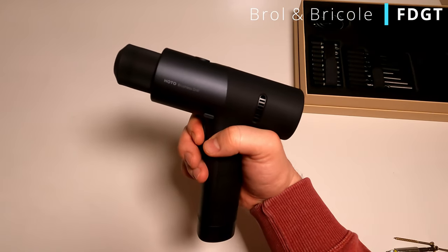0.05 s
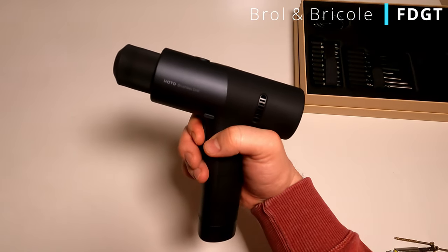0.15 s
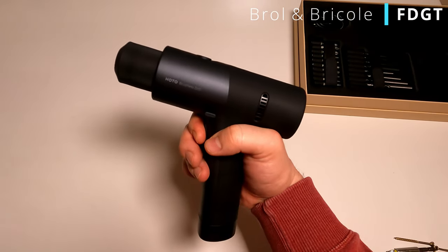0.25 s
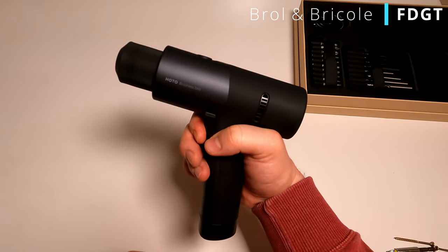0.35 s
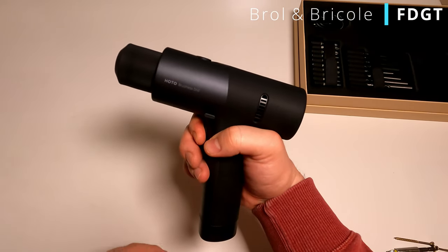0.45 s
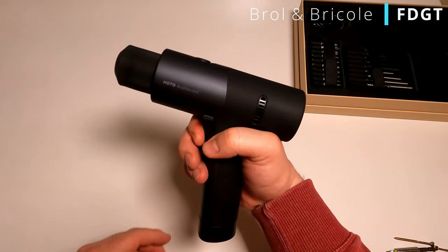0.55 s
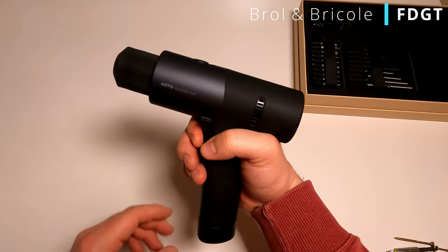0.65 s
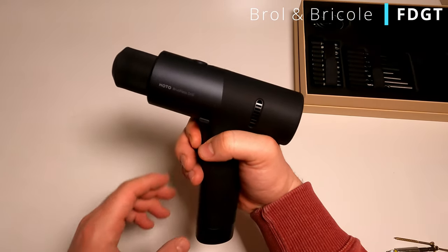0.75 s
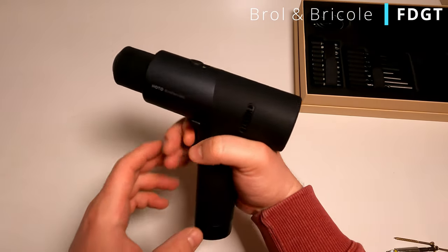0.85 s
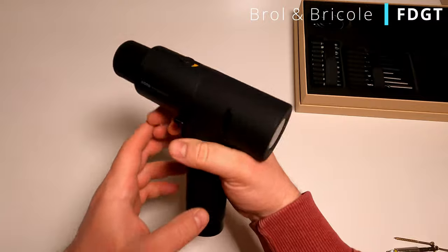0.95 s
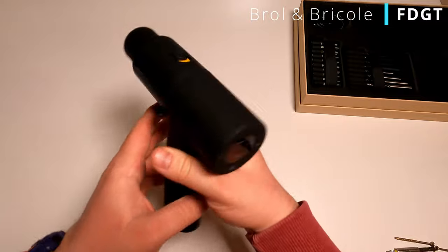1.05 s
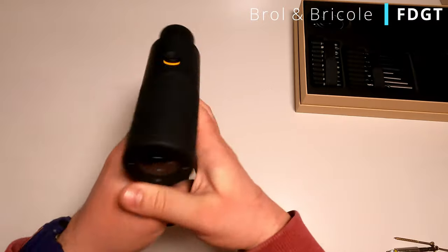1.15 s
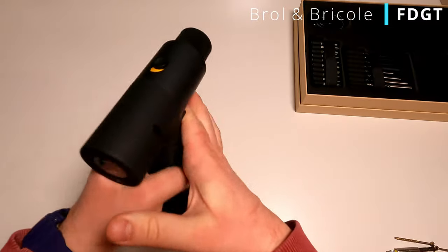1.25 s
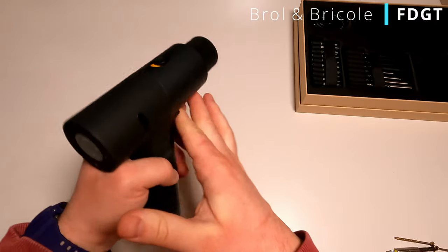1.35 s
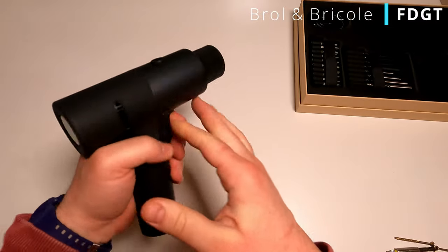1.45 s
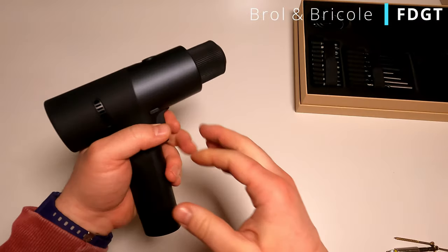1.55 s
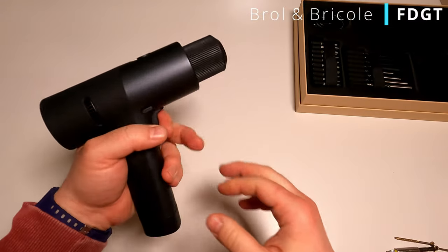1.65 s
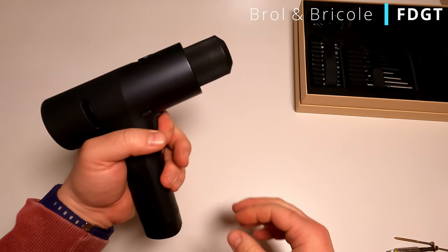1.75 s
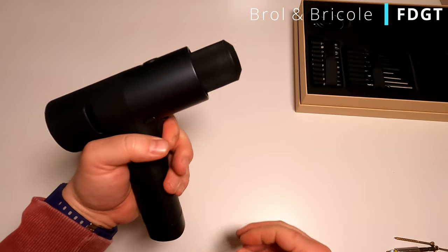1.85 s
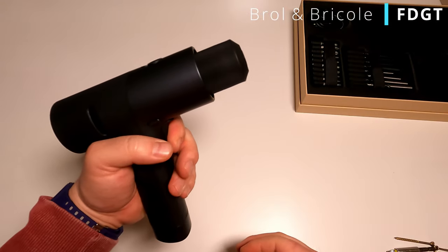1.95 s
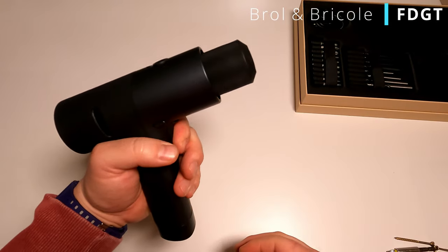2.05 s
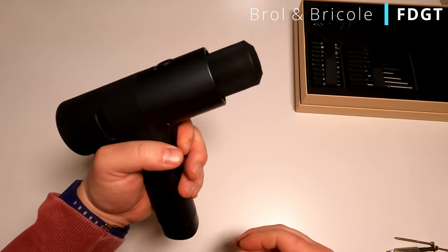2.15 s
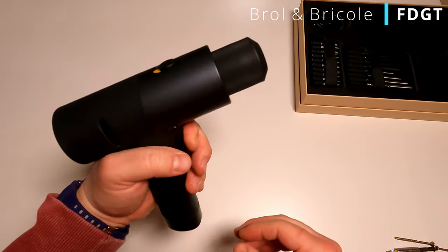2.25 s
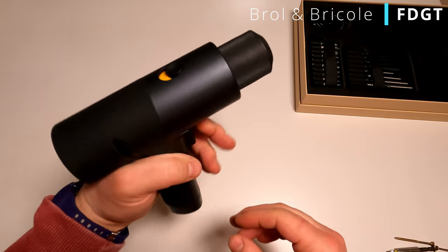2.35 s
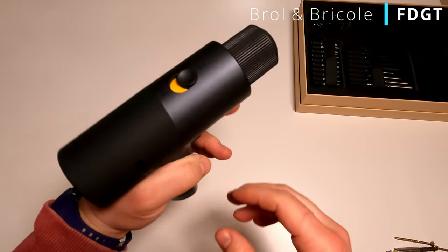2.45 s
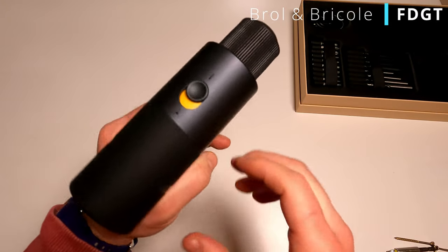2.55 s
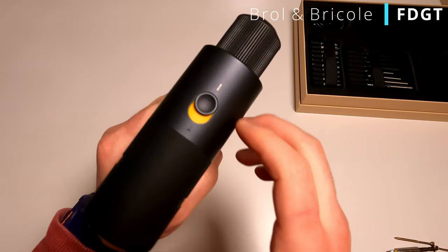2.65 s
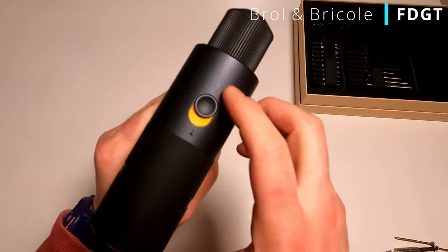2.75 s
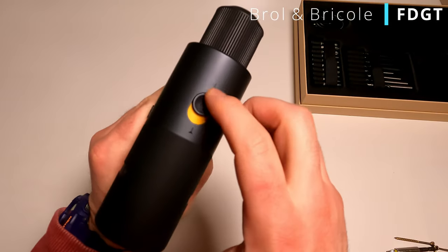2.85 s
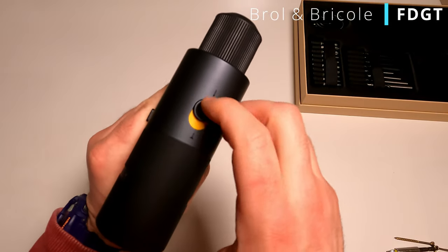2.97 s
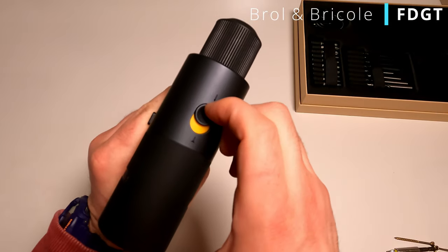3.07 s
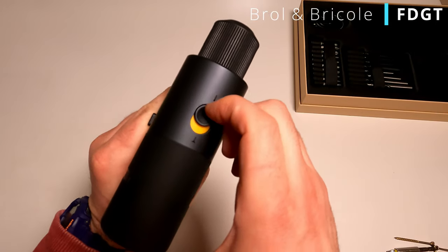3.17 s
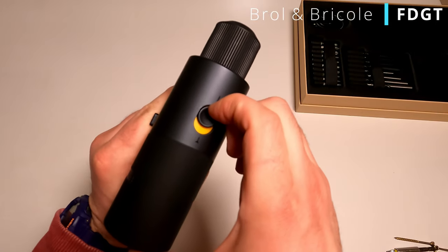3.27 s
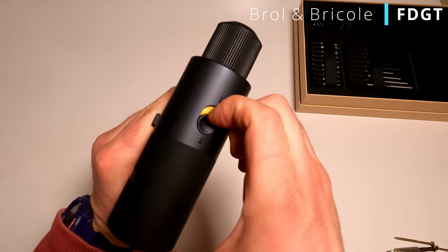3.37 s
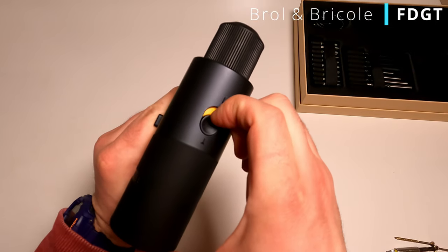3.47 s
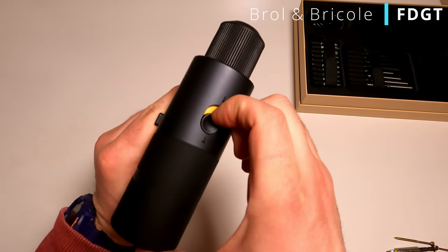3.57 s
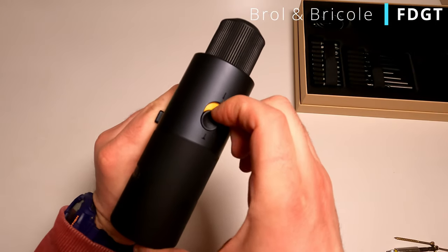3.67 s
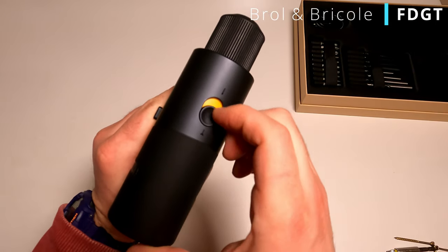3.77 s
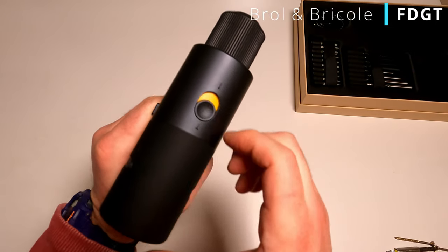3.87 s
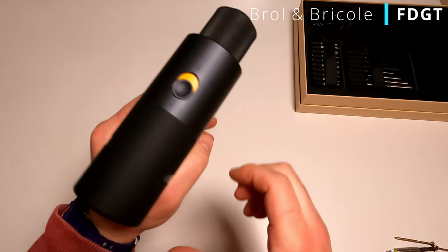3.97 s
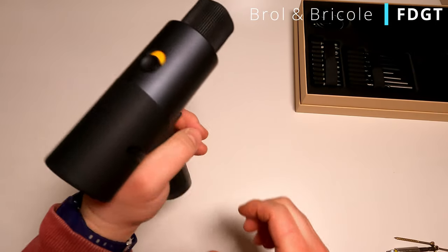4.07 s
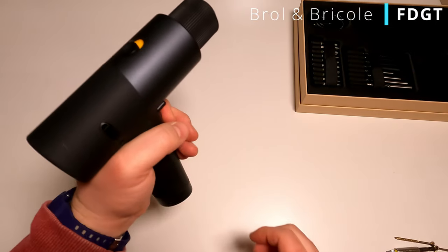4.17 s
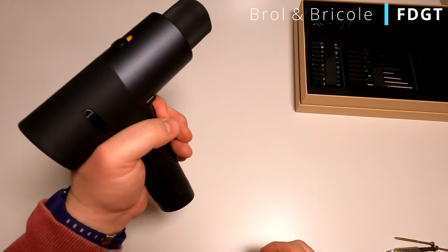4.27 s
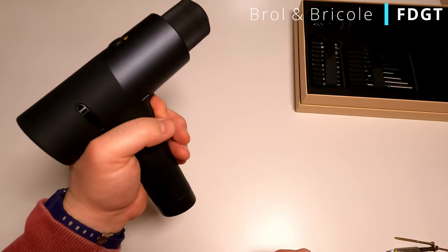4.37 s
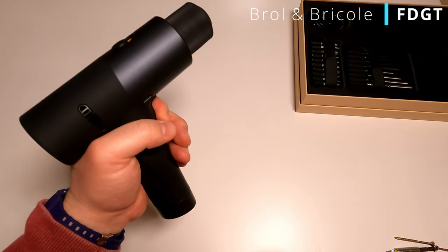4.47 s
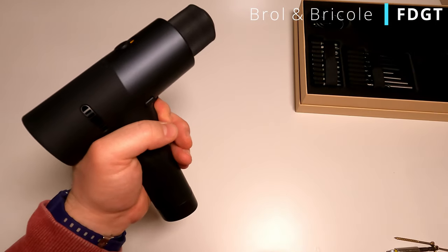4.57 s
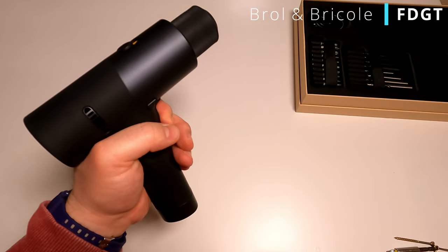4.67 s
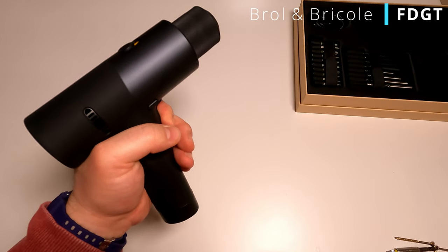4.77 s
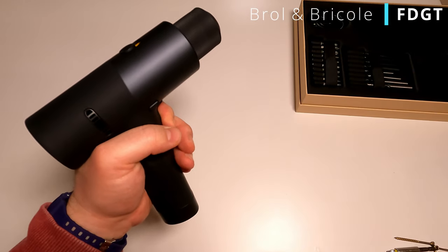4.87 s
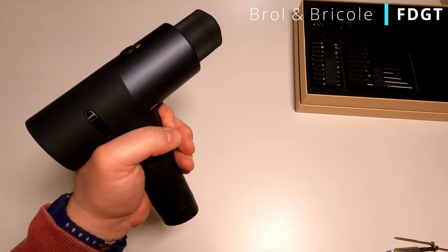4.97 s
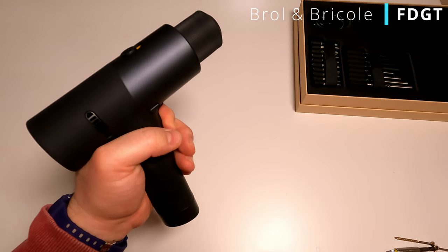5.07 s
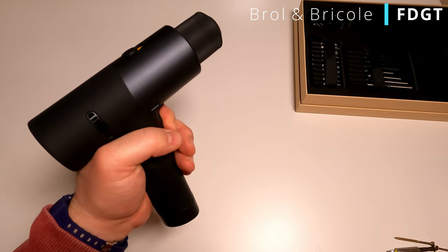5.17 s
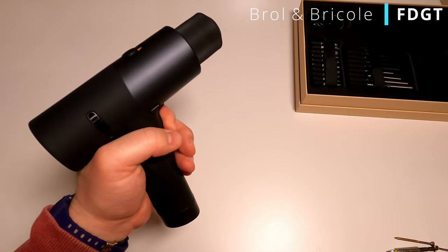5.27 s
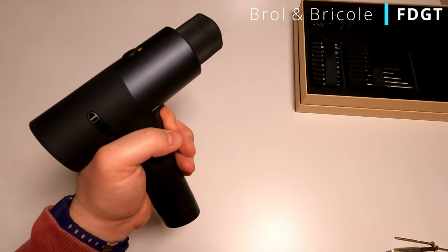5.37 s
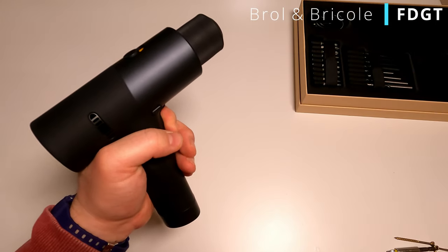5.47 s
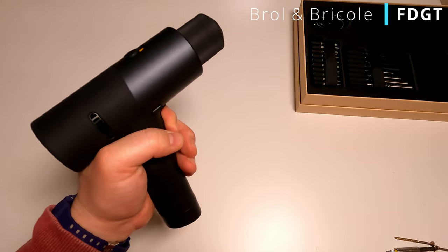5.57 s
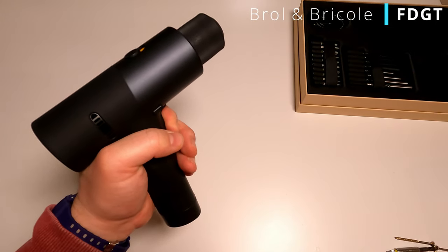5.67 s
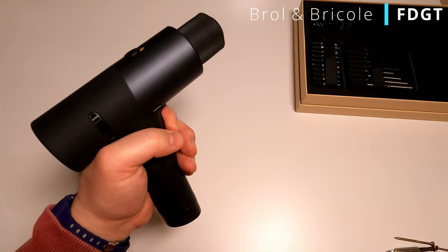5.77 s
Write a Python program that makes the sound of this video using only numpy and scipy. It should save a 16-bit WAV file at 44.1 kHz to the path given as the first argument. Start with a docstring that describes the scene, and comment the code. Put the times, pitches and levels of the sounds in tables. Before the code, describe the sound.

Pulsing, rattling whirr of a handheld electric drill, stopping twice with a metallic crack, quiet handling and one sharp plastic snap before restarting.

```python
"""A cordless drill runs unloaded in three bursts, close to the microphone in a small room: it is already running
at the start and still running at the end. Its motor speed surges about four times a second and drives gear tones
(sines), tooth rattle (shaped noise) and a thin switching whistle; ringing clacks mark the starts and surges.
The spindle lock cracks at each stop. Between bursts hands rub the housing and push a sliding switch until it
snaps over: shaped noise and short clicks, over soft finger knocks, arm rumble and a quiet room tone."""
import sys
import numpy as np
from scipy import signal
from scipy.fft import rfft, irfft, next_fast_len
from scipy.io import wavfile
from scipy.ndimage import uniform_filter1d, map_coordinates

SR = 44100
rng = np.random.default_rng(int(sys.argv[2]) if len(sys.argv) > 2 else 0)


def master(y):
    """Save y as 16-bit WAV."""
    cut = np.clip(np.atleast_2d(y).T, -1, 1)
    pcm = np.round(cut * 32767)  # scale
    wavfile.write(sys.argv[1], SR, pcm.astype(np.int16))


N = 256662

# one surge of the motor at full share, from idle back to idle: since_start_s, speed_turns_per_s
SURGE = [(0, 408), (.02, 590), (.039, 638), (.061, 657), (.083, 637), (.123, 553), (.183, 424), (.203, 408)]
IDLE_SPEED = SURGE[0][1]  # turns per s
# trigger bursts: pressed_s, let_go_s, share_of_full_speed, rattle_db, whine_db, whistle_db, left_minus_right_db
BURSTS = [(-.2845, 1.034, 0.97, -26.9, -33, -48, -1), (1.794, 2.39, 0.97, -26.9, -34, -50, 0.2),
          (4.1734, 6, 1, -30, -33.5, -50, 0.8)]
FIRST_SURGE_S, SURGE_PERIOD_S = .2248, .2608  # wait after the trigger is pressed, then a steady rhythm
# colour of a metallic crack: frequency_hz, level_db_per_hz
METAL_COLOUR = [(180, -67.5), (300, -35), (1450, -7.5), (2080, -9.5), (2880, -1.5), (4050, -10), (6190, -9),
                (6710, -13.5), (11900, -32), (14700, -55.5)]


def amp(db):
    """Decibels to an amplitude factor."""
    return 10 ** (np.asarray(db) / 20)


def unit(x):
    """Scale to rms 1."""
    return x / np.sqrt(np.mean(x ** 2) + 1e-20)


def clock():
    """Time of every sample in seconds."""
    return np.arange(N) / SR


def along(points, hz):
    """Read a curve of (Hz, value) points on a log frequency axis."""
    f, v = np.transpose(points)
    return np.interp(np.log(hz + 1), np.log(f + 1), v)


def wobble(rate):
    """A smooth random curve, rate knots a second."""
    knots = rng.standard_normal(int(N * rate / SR) + 4)
    return map_coordinates(knots, [clock() * rate])


def filtered(x, response):
    """x times a complex response of frequency."""
    size = next_fast_len(N + SR // 2)
    hz = np.fft.rfftfreq(size, 1 / SR)
    return irfft(rfft(x, size) * response(hz), size)[..., :N]


def coloured(x, spectrum):
    """x shaped by (Hz, dB) points, at rms 1."""
    return unit(filtered(x, lambda hz: amp(along(spectrum, hz))))


def impulse(spectrum, size=1024):
    """The causal response of energy 1 that has this spectrum, by folding its cepstrum (minimum phase)."""
    hz = np.fft.rfftfreq(size, 1 / SR)
    cepstrum = irfft(np.log(amp(along(spectrum, hz)) + 1e-6))
    cepstrum[1:size // 2] *= 2
    cepstrum[size // 2 + 1:] = 0
    h = irfft(np.exp(rfft(cepstrum)))
    return h / np.linalg.norm(h)


def add(track, s, sound):
    """Mix a sound into a track at time s."""
    part = track[..., max(round(s * SR), 0):][..., :sound.shape[-1]]
    part += sound[..., :part.shape[-1]]


def drill(rattle_growth):
    """Motor speed drives all three layers: faster is louder, and the gear tones rise."""
    # gear rattle as it leaves the housing, one per burst: frequency_hz, level_db_per_hz
    rattle_a = [(71, -60), (120, -29), (243, -19), (748, -16), (1290, -6), (2310, -7.5), (2880, -3.5),
                (3380, -4.5), (6560, -12), (8180, -21), (10200, -29), (11100, -34), (13800, -43),
                (14700, -89)]
    rattle_b = [(71, -51.5), (120, -24.5), (844, -18.5), (1140, -12), (1370, -9), (1850, -4), (2350, -6),
                (3120, -3.5), (3450, -6), (7400, -12), (8180, -21), (12500, -35), (13800, -47),
                (14700, -89.5)]
    rattle_c = [(71, -51), (120, -23.5), (194, -15), (861, -17.5), (1780, -5), (2310, -8), (3120, -2),
                (4480, -8), (7550, -5), (8350, -18), (10200, -23), (11500, -34.5), (13800, -44),
                (14700, -93)]
    # how strongly the housing radiates the gear tones, one per burst: frequency_hz, gain_db
    voice_a = [(600, -8), (850, 1.5), (1200, 5.5), (1310, 4), (1450, -2), (1850, -2), (2200, -8), (2450, 0),
               (2780, 5), (3080, 3.5), (3350, -8.5), (4200, -20.5), (6000, -15.5)]
    voice_b = [(600, -9), (1000, -5), (1220, -2.5), (1500, -6), (1780, 4.5), (1950, 0), (2100, -12.5),
               (2450, 2.5), (2800, -2.5), (3100, 8), (3350, -1), (4200, -18.5), (6000, -14.5)]
    voice_c = [(600, -19), (1000, -6), (1220, -5), (1570, -4), (1780, 6), (1960, 5.5), (2060, -4),
               (2450, 0.5), (2850, -0.5), (3060, 7.5), (3300, -4), (4200, -11), (6000, -16)]
    out = np.zeros((2, N))
    grips = zip(BURSTS, (rattle_a, rattle_b, rattle_c), (voice_a, voice_b, voice_c))
    for burst, spectrum, voice in grips:
        pressed, let_go, share, rattle_db, whine_db, whistle_db, pan_db = burst
        speed = share * motor_speed(pressed, let_go)
        turns = np.cumsum(speed) / SR
        pace = speed / IDLE_SPEED
        teeth = rattle(turns, spectrum, grain_db=1.62, throb_db=1.08, repeat_db=-10.5)
        sound = amp(rattle_db) * pace ** rattle_growth * teeth
        sound += amp(whine_db) * whine(speed, turns, voice, flutter_db=1.7)
        sound += amp(whistle_db) * whistle(pace, turns, upper_db=-13.5, flutter_db=1.5)
        out += sound * amp([[pan_db / 2], [-pan_db / 2]])
    return out


def motor_speed(pressed, let_go):
    """Turns per second at full share: the motor spins up, surges at a steady rhythm, and runs down on release."""
    # the motor brakes, crawls and halts, an upper limit on speed: since_let_go_s, speed_turns_per_s
    run_down = [(0, 670), (.09, 280), (.12, 260), (.135, 0)]
    spin_up_s = .022  # time constant
    t = clock()
    held = np.maximum(t - pressed, 0)
    since_surge = np.maximum(held - FIRST_SURGE_S, 0) % SURGE_PERIOD_S
    surging = np.interp(since_surge, *np.transpose(SURGE))
    spin_up = 1 - np.exp(-held / spin_up_s)
    return np.minimum(surging * spin_up, np.interp(t - let_go, *np.transpose(run_down)))


def whine(speed, turns, voice, flutter_db):
    """Gear tones swell as they glide through the housing's resonances; most chirp out while the motor pulls."""
    # gear and motor tones: multiple_of_motor_speed, level_db, extra_db_while_pulling, growth_exponent (sign unused)
    gear_orders = [(3, 0, -0.5, 1.04), (4, -23, 4.5, 1), (5, -8.8, 9, 2.46), (5.5, -15.5, 2.5, 1),
                   (6, -21.5, 5.5, 1), (7, -2.3, 11, 0.71), (8, -3, -1, .5)]
    full_pull = 8000  # acceleration at which the teeth are fully loaded, turns per s per s
    mesh_jitter = .16  # scale of the tones' phase wavering, radians
    pace = speed / IDLE_SPEED
    spun_up = pace > 1
    acceleration = np.gradient(speed) * SR
    load = np.clip(uniform_filter1d(spun_up * acceleration, size=128) / full_pull, 0, 1)
    tones = np.zeros(N)
    for order, db, load_db, growth in gear_orders:
        level = db + load_db * load + along(voice, order * speed) + flutter_db * wobble(130)
        phase = 2 * np.pi * order * turns + mesh_jitter * wobble(220)
        tones += amp(level) * pace ** abs(growth) * np.sin(phase)
    return np.sqrt(2) * tones * np.minimum(pace, 1) ** 1.5  # slow gears barely sing


def rattle(turns, spectrum, grain_db, throb_db, repeat_db):
    """Countless tooth contacts, partly repeating and bunched once every second motor turn, ring in the shell."""
    # the shell's narrow peaks and dips: centre_hz, width_hz, gain_db
    shell_peaks = [(997, 103, 6), (1870, 370, 3), (2340, 130, -5.5), (3705, 170, 5), (4050, 120, -0.5),
                   (4176, 120, 4), (4970, 200, 3), (5460, 230, -3), (6750, 830, 2), (11700, 1800, 1)]
    contacts = rng.standard_normal(N) + amp(repeat_db) * tooth_pattern(turns)
    strength = amp(grain_db * wobble(900) + throb_db * np.cos(np.pi * turns))

    def shell(hz):
        """Bell-shaped gains, summed in dB."""
        return amp(sum(db * np.exp(-((hz - centre) / width) ** 2) for centre, width, db in shell_peaks))

    return coloured(filtered(strength * contacts, shell), spectrum)


def tooth_pattern(turns, count=100, size=4096):
    """The gears' small faults come round again with every turn of the planet carrier."""
    planet_ratio = 4  # motor turns per carrier turn
    harmonics = rng.standard_normal(count) + 1j * rng.standard_normal(count)
    faults = irfft(np.append(0, harmonics), size)
    return unit(np.interp(turns / planet_ratio, np.arange(size) / size, faults, period=1))


def whistle(pace, turns, upper_db, flutter_db):
    """The drive's switching tone with sidebands that follow the rotor; a thinner whistle above dips with speed."""
    # switching tone and sidebands: shift_in_multiples_of_motor_speed, level_db, growth_exponent
    sidebands = [(1, -1, 0.98), (-1, -5.5, 1.5), (0, -8.5, 0.028)]
    switching_hz, upper_hz = 9970, 14078  # before any shift by the rotor
    t = clock()
    tones = np.zeros(N)
    for shift, db, growth in sidebands:
        tones += amp(db) * pace ** growth * np.sin(2 * np.pi * (switching_hz * t + shift * turns))
    tones += amp(upper_db) * pace * np.sin(2 * np.pi * (upper_hz * t - turns))
    return np.sqrt(2) * tones * amp(flutter_db * wobble(60)) * np.minimum(pace, 1)


def backlash(surge_db):
    """The gears take up their play: they knock hard when the motor starts, and lightly at each surge."""
    # knocks at the starts: start_s, peak_db
    start_knocks = [(1.7928, -9), (1.797, -10.5), (1.803, -19), (1.815, -18.5), (4.1726, -8.5),
                    (4.177, -13.5), (4.194, -20), (4.2105, -18)]
    out = np.zeros(N)
    for s, db in start_knocks:
        add(out, s, amp(db) * clack(attack=0.0013, crack_db=-19.5))
    for pressed, let_go, *_ in BURSTS:
        surges = np.arange(pressed + FIRST_SURGE_S, let_go, SURGE_PERIOD_S)
        for s in surges[surges > 0]:
            add(out, s + .007, amp(surge_db) * clack(attack=0.00072, crack_db=-1.5))
    return out


def clack(attack, crack_db):
    """One blow of gear on gear, of peak 1: the gearbox rings over a short metallic crack."""
    # gearbox resonances: pitch_hz, level_db (each blow varies it), t60_s
    gearbox_modes = [(2270, -19, 0.03), (3045, 2, 0.018), (3134, -1.5, 0.025), (3374, 0, 0.018),
                     (4500, -16.5, 0.018), (6950, -19.5, 0.024)]
    t = np.arange(SR // 20) / SR
    ring = np.zeros(len(t))
    for hz, db, t60 in gearbox_modes:
        ring += amp(db + rng.normal(0, 1) - 60 * t / t60) * np.sin(2 * np.pi * hz * t)
    crack = amp(crack_db - 60 * t / 0.016) * rng.standard_normal(len(t))
    blow = ring + signal.lfilter(impulse(METAL_COLOUR), 1, crack)
    blow *= 1 - np.exp(-t / attack)
    return blow / np.abs(blow).max()


def spindle_lock():
    """The spindle lock catches as the motor stops: a few hard metallic contacts."""
    # contacts: start_s, level_db, tilt_db_per_octave
    catches = [(1.147, -20.5, -2.5), (1.1515, -14.5, -1), (1.171, -30.5, -1.5), (2.499, -38, -2),
               (2.5135, -18.5, 0), (2.518, -14.5, -0.5), (2.53, -34.5, -5)]
    return clicks(catches, METAL_COLOUR, t60=0.022, spike=2.4)


def switch_ticks():
    """Plastic parts tick, and the sliding switch snaps over in a tight cluster of contacts."""
    # contacts: start_s, level_db, tilt_db_per_octave
    contacts = [(1.389, -39.5, -1), (1.699, -50, -3), (2.8, -44, 7), (3.244, -53, -3), (3.325, -46.5, -4.5),
                (3.368, -51.5, -1), (3.422, -45.5, -1.5), (3.4705, -36.5, 1), (3.5152, -21.5, -1),
                (3.5168, -11.7, 1.3), (3.5207, -14, 0.3), (3.522, -16.5, -1)]
    # colour of the plastic: frequency_hz, level_db_per_hz
    plastic_colour = [(180, -66.5), (300, -28), (666, -31.5), (1240, -6), (2110, -4.5), (3070, -5),
                      (4120, -4.5), (4470, -6), (10200, -26), (13500, -39.5), (14700, -62.5)]
    return clicks(contacts, plastic_colour, t60=0.014, spike=4.6)


def clicks(rows, colour, t60, spike):
    """Hard contacts: a spike and a fast-dying crackle through the part's colour, each with its own room answer."""
    out = np.zeros((2, N))
    t = np.arange(SR // 25) / SR
    for s, db, tilt_db in rows:
        body = impulse([(hz, level + tilt_db * np.log2(hz)) for hz, level in colour])
        force = rng.standard_normal(len(t)) * amp(-60 * t / t60)
        force[0] += spike
        click = signal.fftconvolve(force, body)
        add(out, s, amp(db) * in_room(np.array([click, click])))
    return out


def knocks(t60, attack):
    """A fingertip is soft: it wakes just one well damped resonance of the hollow housing."""
    # finger knocks: start_s, pitch_hz, level_db (before the soft attack)
    finger_knocks = [(3.176, 1600, -52), (3.244, 1550, -46), (3.908, 1400, -59.5), (3.955, 1230, -58),
                     (4.039, 1280, -57)]
    out = np.zeros(N)
    t = np.arange(SR // 20) / SR
    for s, hz, db in finger_knocks:
        envelope = amp(db - 60 * t / t60) * (1 - np.exp(-t / attack))
        add(out, s, envelope * np.sin(2 * np.pi * hz * t))
    return out


def hands(grain_db):
    """Skin sticks and slips on the housing, the switch drags in its track, the moving arms rumble."""
    # skin rubs as the grip changes: start_s, length_s, level_db
    rubs = [(1.18, 0.63, -57.5), (1.5, .16, -54.5), (2.8, 0.21, -64.5), (3.86, .2, -70), (4.07, 0.17, -61)]
    # the switch drags in its track: start_s, length_s, level_db
    scrapes = [(2.87, .07, -64), (2.97, 0.2, -66), (3.1, .09, -65.5)]
    # arm movements that rumble: start_s, length_s, level_db
    moves = [(.2, 0.14, -57), (.95, 1.3, -51), (1.92, 0.16, -49), (2.42, 0.35, -49.5), (3.46, 0.12, -49.5),
             (3.75, 0.99, -53.5), (3.99, .08, -45), (5.45, 0.24, -49.5)]
    # colours of skin, switch track and arms: frequency_hz, level_db_per_hz
    skin_colour = [(350, -56.5), (600, -26), (1200, -18), (1290, -11), (1700, -9), (2480, -7), (3280, -9.5),
                   (4960, -6.5), (7920, -11.5), (14700, -34)]
    track_colour = [(800, -34), (1450, -7), (1720, -3), (2300, -22), (3200, -19), (3950, -5), (5000, -17.5),
                    (7000, -16.5), (13000, -37)]
    rumble_colour = [(13, -53), (22, -13.5), (46, -5), (56, -3), (63, 4), (74, -4.5), (120, -19),
                     (233, -21), (277, -28.5), (389, -26), (548, -39.5), (900, -54.5), (1980, -120)]
    still_rub_db = -75  # hands merely holding the drill

    def friction(spectrum):
        """Noise of grainy strength, in the colour of the rubbed part."""
        return coloured(rng.standard_normal(N) * amp(grain_db * wobble(250)), spectrum)

    skin = np.hypot(amp(still_rub_db), strokes(rubs, fullness=1.2)) * friction(skin_colour)
    switch = strokes(scrapes, fullness=0.91) * friction(track_colour)
    arms = strokes(moves, fullness=1.0) * coloured(rng.standard_normal(N), rumble_colour)
    return skin + switch + arms


def strokes(rows, fullness):
    """Gain of (start, length, dB) movements: each swells and fades in one arch."""
    t = clock()
    gain = np.zeros(N)
    for start, length, db in rows:
        progress = np.clip((t - start) / length, 0, 1)
        gain += amp(db) * np.abs(np.sin(np.pi * progress)) ** fullness
    return gain


def room_tone(level_db):
    """The quiet room: steady noise, mostly low."""
    # colour of the quiet room: frequency_hz, level_db_per_hz
    quiet_colour = [(20, -12), (45, 1.5), (90, -1), (130, -5), (250, -6.5), (330, -16), (500, -23.5),
                    (900, -29.5), (2500, -70)]
    return amp(level_db) * coloured(rng.standard_normal(N), quiet_colour)


def in_room(pair, wet_db=-13, build=0.011, width=0.54, left_db=1):
    """The direct sound plus a diffuse tail that builds up and dies at each frequency's own speed."""
    # how long the tail lasts: frequency_hz, t60_s
    tail_t60 = [(300, 0.13), (1200, 0.43), (5000, 0.44), (8000, 0.42), (13000, 0.22)]
    # colour of the tail: frequency_hz, gain_db
    tail_colour = [(200, 4), (700, 2.5), (1300, -6), (5700, -5), (6500, -5.5), (13000, -4.5)]
    hz, t, z = signal.stft(rng.standard_normal((2, SR // 2)), SR, nperseg=256)
    decay_db = along(tail_colour, hz)[:, None] - 60 * t / along(tail_t60, hz)[:, None]
    gain = amp(decay_db) * (1 - np.exp(-t / build))
    mid, side = signal.istft(z * gain, SR, nperseg=256)[1]
    tail = np.array([mid + width * side, mid - width * side]) / np.linalg.norm(mid)
    response = amp([[wet_db + left_db], [wet_db - left_db]]) * tail
    response[:, 0] += 1  # direct sound
    return signal.fftconvolve(pair, response, axes=1)[:, :N]


def port_delay(pair):
    """The sound reaches the right microphone port slightly first: a phase split that varies with frequency."""
    # phase between the ports: frequency_hz, left_lead_radians
    port_phase = [(100, -0.11), (700, -0.31), (1300, -0.34), (2000, -0.46), (3000, -0.65), (5000, -0.47),
                  (8000, -0.69), (13000, -0.36)]
    sides = np.array([[1], [-1]])
    return filtered(pair, lambda hz: np.exp(.5j * along(port_phase, hz) * sides))


def scene():
    """Drill, hands, clicks and room tone, all in the room, heard at two ports."""
    running = drill(rattle_growth=1.1) + backlash(surge_db=-13.5)
    handling = hands(grain_db=1.8) + knocks(t60=.02, attack=.0005)
    pair = in_room(running + handling + room_tone(level_db=-64))
    pair = pair + spindle_lock() + switch_ticks()  # these bring their own room
    return port_delay(pair)


def record(dry):
    """The recorder keeps nothing above its band limit."""
    top_hz = 14800
    return filtered(dry, lambda hz: hz < top_hz)


dry = scene()
out = record(dry)
master(out)
```